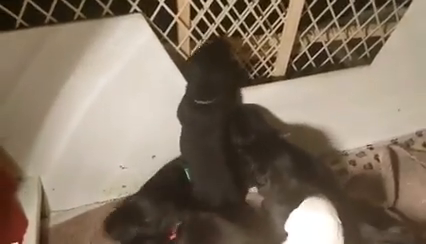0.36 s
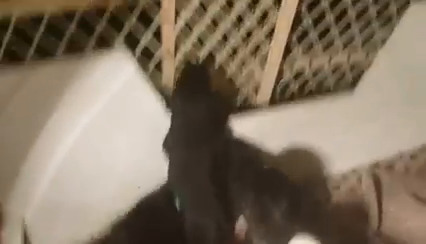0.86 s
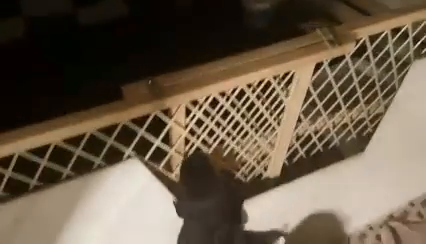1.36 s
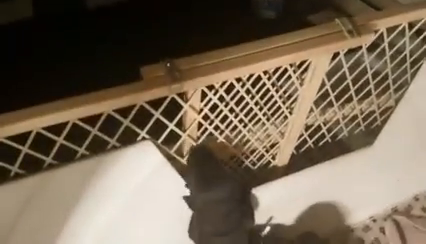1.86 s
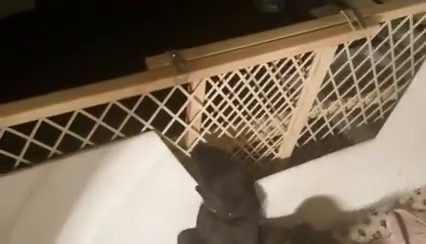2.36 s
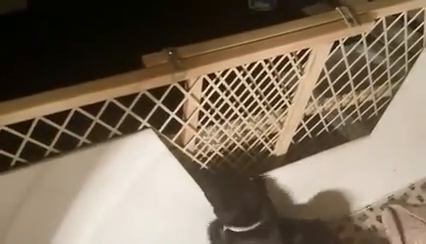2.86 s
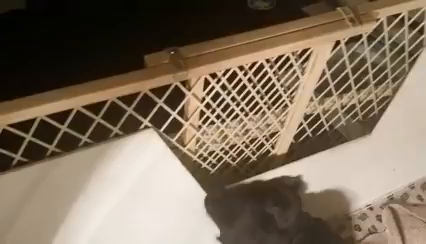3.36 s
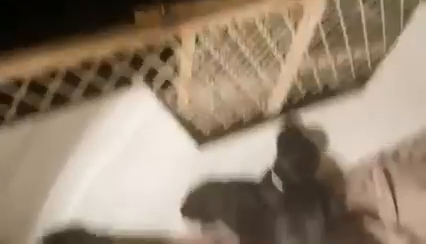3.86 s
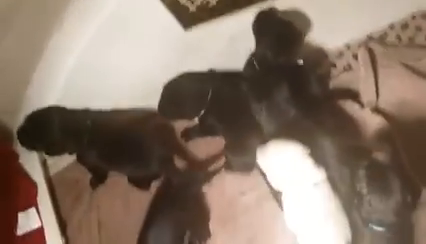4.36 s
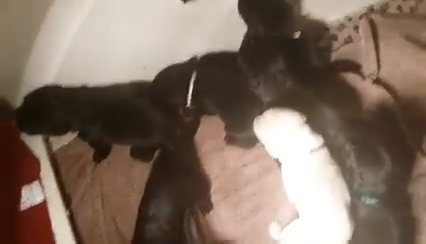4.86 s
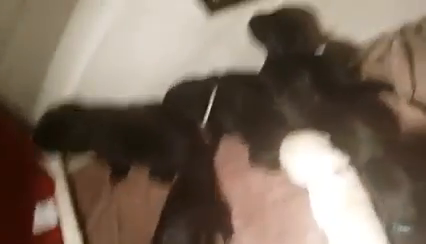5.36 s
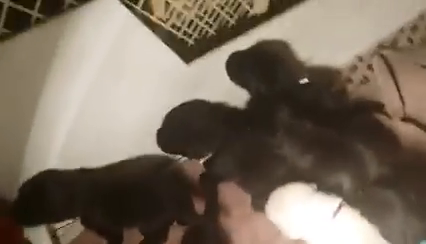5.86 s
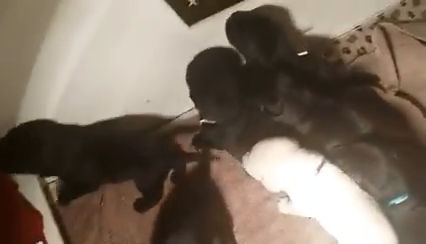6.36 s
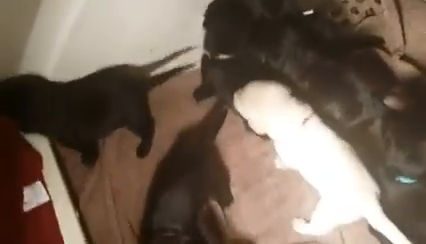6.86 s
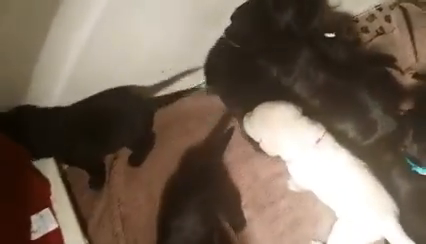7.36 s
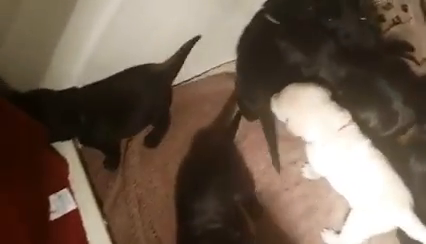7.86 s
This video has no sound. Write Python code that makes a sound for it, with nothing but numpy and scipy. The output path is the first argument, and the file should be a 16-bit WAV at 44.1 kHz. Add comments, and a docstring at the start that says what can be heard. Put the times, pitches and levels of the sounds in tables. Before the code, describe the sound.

A puppy litter in a small, hard-walled indoor pen, heard closely over faint steady hiss with a short, dull echo. From 0 to 1.5 seconds there are only weak whimpers, sniffs and slight rustle, with handling bumps around 0.7-0.85 and a very sharp click at 0.96, mostly right. At 1.7-2.1 a thin whine rises, then falls, followed by softer whines, yips and breathy puffs to 3. Around 3.3-3.6 low whines and yips mix with blanket rustle and a cluster of knocks. Short whimpers and yips follow near 4.1, with a click at 4.4. It quiets around 5, then whines and rustling return at 5.4-5.8. A hard click marks 6.2 as high whining swells, sliding down into a low moan by 6.9. A bright yip comes at 7.17, then small whimpers, sniffs and brief yips until a final whine around 8.2.

```python
"""A small hard-walled pen closed by a wooden gate, where a litter of puppies whines and whimpers.
Voices are harmonic sums on gliding pitches, some with half-pitch lines, answered by the near walls.
Shaped noise makes the puffs and sniffs, the blankets, the shuffling bodies and the room tone.
The hand on the recorder makes its case click (decaying modes) and bump (filtered pressure steps),
mostly at the right microphone port."""
import sys
import numpy as np
from scipy import signal
from scipy.fft import rfft, irfft, next_fast_len
from scipy.io import wavfile

SR = 44100
rng = np.random.default_rng(int(sys.argv[2]) if len(sys.argv) > 2 else 0)


def output_pcm(signal):
    """Save a mono or channel-first signal as 16-bit PCM at the path in sys.argv[1].

    Samples are clipped to [-1, 1] before scaling.
    """
    pcm = np.clip(np.atleast_2d(signal).T, -1, 1) * 32767
    wavfile.write(sys.argv[1], SR, np.round(pcm).astype(np.int16))


def elevation(decibels):
    """Turn decibel levels (scalar or array-like) into linear amplitude ratios."""
    levels = np.asarray(decibels, float)
    return 10 ** (levels / 20)


N = 362943


def rms_one(x):
    """Normalisation: scales a signal to unit root-mean-square."""
    return x / np.sqrt(np.mean(x ** 2) + 1e-20)


def in_time(rows, t):
    """Linear interpolation: reads each column of a breakpoint table at the times t."""
    s, *columns = np.transpose(rows)
    return [np.interp(t, s, c) for c in columns]


def drift(rate_hz, size):
    """Low-passed chance: white noise through two equal real poles wanders slowly; rms 1."""
    r = np.exp(-2 * np.pi * rate_hz / SR)
    settle = 4000
    noise = rng.standard_normal(size + settle)
    return rms_one(signal.lfilter([1], [1, -2 * r, r * r], noise)[settle:])


def coloured(spectrum, alike):
    """Partial coherence: mid and side noises of one spectrum set the left-right likeness; rms 1."""
    hz, db = np.transpose(spectrum)
    size = next_fast_len(N)
    f = np.arange(size // 2 + 1) * SR / size + 1
    gain = elevation(np.interp(np.log(f), np.log(hz), db, left=-90, right=-90))
    mid, side = irfft(rfft(rng.standard_normal((2, size))) * gain, size)[:, :N]
    return rms_one(np.sqrt(1 + alike) * mid + np.sqrt(1 - alike) * side * np.array([[1], [-1]]))


def swells(rows, fall_db_per_s):
    """Energy addition: each row rises 20 dB per swell time, holds, then fades; powers add."""
    t = np.arange(0, N + 64, 64) / SR
    s, swell, hold, *levels = np.transpose(rows)[:, :, None]
    rise_db = -20 * np.maximum(s - t, 0) / np.maximum(swell, .005)
    fall_db = -fall_db_per_s * np.maximum(t - s - hold, 0)
    envelopes = []
    for db in levels:
        power = np.sum(elevation(2 * (db + rise_db + fall_db)), axis=0)
        envelopes.append(np.interp(np.arange(N) / SR, t, np.sqrt(power)))
    return envelopes


# spectrum of the room tone: (f/Hz, relative level/dB)
ROOM_SPECTRUM = [(18, -63), (30, -41), (43, 5), (566, 3), (816, -3), (3190, -10), (6310, -13),
                 (10900, -16.5), (14200, -11.5), (15800, -31)]


def room_tone():
    """Stationary noise: a steady, partly coherent background of fixed spectrum."""
    return elevation(-68.5) * coloured(ROOM_SPECTRUM, alike=0.47)


# hoarseness of the litter: (t/s, full rasp against the tone: level/dB)
RASP = [(.3, -10), (1.3, -13), (1.5, -6), (1.7, -22), (2.0, -22), (2.06, -7), (3.1, -9), (5.9, -10),
        (6.1, -17), (6.35, -16), (6.4, -14), (6.5, -16), (6.9, -15), (7.5, -6), (8.1, -6), (8.15, -10)]


def fold_chance():
    """Aperiodicity of the folds: one tremble, waver and rasp, read at the time of each call."""
    rasp_db, = in_time(RASP, np.arange(N) / SR)
    return drift(34.2, N), drift(51, N), elevation(rasp_db) * drift(155, N)


# mouth resonance on the two lowest partials: (f/Hz, level/dB)
MOUTH_RESONANCE = [(300, -0.5), (420, -10.5), (600, -3.5), (800, 1.5), (1100, 0.5), (1600, -9.5),
                   (2300, -3), (3200, -12)]
# throat colour of the partials above the octave, against the two lowest: (f/Hz, level/dB)
THROAT_COLOUR = [(900, -2.5), (1500, -7), (2400, -16), (3700, -18.5), (4800, -14), (6200, 5.5), (7600, -10),
                 (8800, 2.5), (11000, -28)]


def voice(rows, chance, high_db):
    """Source and filter: near-sine folds on a trembling pitch, shaped by mouth and throat."""
    jitter, shimmer_db = .011, 1.8     # rms pitch share; rms level swing
    rasp_growth_s = .04                # a call starts clear and roughens
    a, b = int(rows[0][0] * SR), min(int(rows[-1][0] * SR), N)
    n = np.arange(b - a)
    tremble, waver, rasp = [c[a:b] for c in chance]
    hz, effort_db, open_db, *half_db = in_time(rows, np.arange(a, b) / SR)
    rasp = rasp * np.clip(n / (rasp_growth_s * SR), .2, 1)

    mouth_hz, mouth_db = np.transpose(MOUTH_RESONANCE)
    first_db = effort_db + np.interp(np.log(hz), np.log(mouth_hz), mouth_db)
    octave_db = open_db + effort_db + np.interp(np.log(2 * hz), np.log(mouth_hz), mouth_db)
    phase = 2 * np.pi * np.cumsum(hz * (1 + jitter * tremble)) / SR
    tone = elevation(first_db) * np.sin(phase) + elevation(octave_db) * np.sin(2 * phase)
    for db in half_db:     # the half-pitch line and its third harmonic
        tone += elevation(db) * (np.sin(phase / 2) + elevation(-3.5) * np.sin(3 * phase / 2))

    throat_hz, throat_db = np.transpose(THROAT_COLOUR)
    drive = elevation(first_db - 4.0) + elevation(octave_db)
    for k in range(3, 16):
        shape_db = np.interp(np.log(k * hz), np.log(throat_hz), throat_db, right=-90)
        shape_db += high_db - 13.97 * np.log2(k / 2)     # the pulse of the folds weakens with order
        blurred = k * (phase + .6 * rasp) + k * k        # rasp blurs high orders most
        tone += drive * elevation(shape_db) * np.sin(blurred)

    edge = np.minimum(1, np.minimum(n / (0.0009 * SR), n[::-1] / (0.0025 * SR)))
    out = np.zeros(N)
    out[a:b] = np.sqrt(2) * tone * edge * elevation(shimmer_db * waver) * (1 + rasp)
    return out


ATTACK_S, RELEASE_S = .012, 0.02
QUIET_DB = -30     # short calls start from and die to this level against their effort


def short_call(s, length, first_hz, last_hz, db, octave_db):
    """Envelope and glide: attack, a held glide, release; the mouth opens with effort in the attack."""
    opening_db_per_db = 4.5
    end = s + max(length, ATTACK_S + .002)
    shut_db = octave_db + opening_db_per_db * QUIET_DB
    return [(s, first_hz, db + QUIET_DB, shut_db), (s + ATTACK_S, first_hz, db, octave_db),
            (end, last_hz, db, octave_db), (end + RELEASE_S, last_hz, db + QUIET_DB, octave_db)]


# whimpers whose every second cycle weakens:
# (t/s, length t/s, pitch f/Hz, effort level/dB, half-pitch line level/dB)
WHIMPER_CALLS = [(0.0, 0.051, 795, -49.5, -61), (0.209, 0.017, 725, -44, -51),
                 (3.158, .04, 793, -42, -54.5), (3.818, 0.034, 763, -40, -42),
                 (4.035, .04, 819, -33.5, -48), (4.072, .035, 905, -45, -43), (4.562, .03, 857, -49, -55.5),
                 (4.97, 0.037, 717, -43, -46.5), (7.477, 0.0714, 875, -39, -47),
                 (7.731, 0.048, 791, -36, -52), (8.0, .06, 809, -37, -44)]


def whimper(s, length, hz, db, half_db):
    """Period doubling: a sagging call whose half-pitch line grows in and outlasts the tone."""
    pitch_sag, break_s = 0.064, 0.032     # share of pitch lost; time until the line is full
    length = max(length, ATTACK_S + break_s + 0.0014)
    start, full, end, gone = short_call(s, length, hz, hz * (1 - pitch_sag), db, octave_db=-7.0)
    return [(*start, half_db + 2 * QUIET_DB), (*full, half_db + QUIET_DB),
            (full[0] + break_s, *full[1:], half_db),
            (*end, half_db), (*gone, half_db + QUIET_DB / 2)]


def whimpers(chance):
    """Superposition: the sum of all period-doubled whimpers."""
    return sum(voice(whimper(*row), chance, high_db=-1.5) for row in WHIMPER_CALLS)


def pen(x):
    """Reverberation: dense dull reflections of the near walls, drawn for each side, dying fast."""
    t60_s, cut_hz, level_db = 0.22, 4600, -11.5
    t = np.arange(int(.4 * SR)) / SR
    tail = rng.standard_normal((2, len(t))) * elevation(-60 * t / t60_s) * (t > .004)
    tail = signal.sosfilt(signal.butter(1, cut_hz, fs=SR, output="sos"), tail)
    tail = tail / np.sqrt(np.sum(tail ** 2, axis=1, keepdims=True))
    return elevation(level_db) * signal.fftconvolve(x, tail, axes=1)[:, :N]


# colour of the two ports: (f/Hz, left minus right level/dB)
PORT_COLOUR = [(60, -3.0), (150, -1), (380, -5.5), (950, -5.0), (2380, -6), (5980, 4.5), (15000, -7.5)]


def placed(x):
    """Interaural-style cues: the two ports differ in colour and in time of arrival."""
    left_lag_s = 0.00013
    hz, db = np.transpose(PORT_COLOUR)
    size = next_fast_len(N)
    f = np.arange(size // 2 + 1) * SR / size + 1
    sides = elevation(np.interp(np.log(f), np.log(hz), db) / [[2], [-2]])
    late = np.exp(-2j * np.pi * f * left_lag_s * np.array([[1], [0]]))
    return irfft(rfft(x, size) * sides / sides.mean(axis=0) * late, size)[:, :N]


# puffs, sniffs and the air of the calls: (full strength at t/s, swell t/s, hold t/s, level/dB)
PUFF_SWELLS = [(.02, 0.06, 0.12, -68.5), (.254, 0.13, 0.018, -64), (.464, 0.039, 0, -63.5),
               (.683, 0.023, 0.065, -67.5), (.838, 0.033, 0.065, -58), (.963, 0.0097, .0, -42),
               (1.0, .03, 0.049, -57), (1.19, 0.054, 0.17, -66), (1.49, 0.12, 0.078, -59.5),
               (1.8, 0.32, 0.049, -55.5), (2.04, 0.32, 0.027, -47.5), (2.335, 0.024, 0.095, -50.5),
               (2.56, 0.15, 0.044, -47.5), (2.9, 0.25, 0.057, -50.5), (3.34, 0.27, 0.047, -48),
               (3.627, 0.13, 0.0099, -44.5), (3.756, .04, 0.079, -53.5), (4.0, 0.14, 0.0032, -40),
               (4.2, 0.19, 0, -57), (4.42, 0.35, 0.023, -58), (4.59, 0.027, 0, -65),
               (4.764, .015, 0.27, -69), (5.093, 0.15, .0, -63.5), (5.265, .03, 0.066, -46),
               (5.572, 0.13, .0, -44.5), (5.747, 0.1, .0, -43.5), (6.056, 0.63, 0.083, -54),
               (6.321, 0.15, 0.15, -56), (6.6, 0.17, 0.2, -54), (6.834, 0.14, 0.0086, -49.5),
               (6.964, .02, 0.014, -41.5), (7.109, 0.052, 0.045, -52), (7.323, 0.34, 0.019, -48.5),
               (7.523, 0.11, 0.075, -56), (7.643, 0.019, .0, -44.5), (7.78, 0.19, 0.011, -58.5),
               (8.0, 0.37, 0.041, -50.5), (8.132, 0.018, 0.025, -44.5)]
# spectrum of the breath: (f/Hz, relative level per Hz/dB)
BREATH_SPECTRUM = [(1180, -13.5), (2000, 1.5), (2680, -8.5), (2930, -6.5), (4830, -5), (6370, -0.5),
                   (7580, -10), (8400, -4.5), (11800, -17), (15000, -14), (15800, -45)]


def breath():
    """Turbulence: smooth hiss of fixed spectrum under the swell of each puff, lightly fluttering."""
    puffing, = swells(PUFF_SWELLS, fall_db_per_s=212)
    return coloured(BREATH_SPECTRUM, alike=.15) * puffing * elevation(1.8 * drift(15, N))


# the litter moves: (full strength at t/s, swell t/s, hold t/s,
# blanket rustle level/dB, shuffling of bodies level/dB)
MOVE_SWELLS = [(.02, 0.056, 0.16, -63, -68), (.7, 0.45, 0.089, -74.5, -62.5),
               (.863, 0.064, 0.16, -53.5, -65), (1.2, 0.055, 0.17, -60.5, -72),
               (1.49, 0.1, 0.063, -52, -71), (1.8, 0.6, 0.097, -55, -63), (2.33, 0.046, 0.36, -54.5, -63.5),
               (2.72, 0.51, 0.23, -67, -53.5), (3.317, 0.068, .0, -45.5, -55),
               (3.527, 0.13, 0.33, -55, -58.5), (4.0, 0.17, 0.056, -49, -56),
               (4.874, 0.21, 0.071, -57.5, -69), (5.288, 0.13, 0.054, -51.5, -58.5),
               (5.582, 0.1, .0, -38, -47.5), (5.8, 0.45, 0.92, -54, -62), (6.3, 0.22, 0, -47, -64),
               (6.834, 0.14, 0.15, -65, -57.5), (7.254, 1, 0.025, -49.5, -57.5),
               (7.46, 0.3, 0.31, -64.5, -63.5), (8.1, 0.22, 0.21, -68, -68.5)]
# spectrum of the blankets: (f/Hz, relative level per Hz/dB)
RUSTLE_SPECTRUM = [(150, -89), (250, -17), (342, 0), (496, -2), (718, -2), (1440, -4.5), (4000, -13.5),
                   (5200, -31.5), (8800, -120)]


def movement():
    """Friction noise: blankets rustle in fast grains, bodies shuffle in slower, low lumps."""
    rustling, shuffling = swells(MOVE_SWELLS, fall_db_per_s=118)
    rustle = coloured(RUSTLE_SPECTRUM, alike=0.091) * rustling * elevation(3.2 * drift(68, N))
    low_noise = coloured([(40, -24), (80, 2), (160, -2.5), (300, -7)], alike=0.86)
    shuffle = low_noise * shuffling * elevation(4.3 * drift(26, N))
    return rustle + shuffle


# bumps of the case, before the bass cut:
# (t/s, peak level/dB at the right port, low-cut corner f/Hz, sharpness as high-cut corner f/Hz)
CASE_BUMPS = [(.675, -15, 90, 4500), (0.736, -36.5, 127, 500), (0.834, -26, 260, 660),
              (0.8433, -17.5, 300, 2170), (.886, -36.5, 259, 600), (0.995, -32.5, 198, 700),
              (1.276, -31, 356, 1500), (1.651, -26.5, 217, 432), (3.295, -16.5, 91, 2390),
              (3.33, -17, 86, 2500), (3.4835, -17, 86.5, 2970), (3.4989, -12, 87, 3560),
              (3.565, -17.5, 90, 2020), (5.51, -43.5, 136, 600), (5.57, -32.5, 172, 600),
              (5.806, -31.5, 162, 600)]


def thumps():
    """Step response: a sudden step of pressure leaks away through a steep low cut and swings."""
    out = np.zeros(N)
    for s, db, ring_hz, sharp_hz in CASE_BUMPS:
        step = signal.sosfilt(signal.butter(2, sharp_hz, fs=SR, output="sos"), np.ones(3000))
        push = signal.sosfilt(signal.butter(4, ring_hz, "high", fs=SR, output="sos"), step)
        at = int(s * SR)
        out[at:at + len(push)] += elevation(db) * push / np.abs(push).max()
    return out * elevation([[-20.0], [0]])     # the left port gets 20 dB less


# clicks of the case, before the bass cut:
# (t/s, peak level/dB at the right port, left minus right level/dB)
CASE_CLICKS = [(0.9592, -5, -36), (0.9707, -26, -17), (1.074, -24.5, -39), (1.2326, -20.5, -26),
               (1.312, -40, -22), (4.1396, -21, -10), (4.4177, -11.5, -17), (5.108, -41.5, -12),
               (5.371, -43.5, 14.5), (5.463, -37, -17), (5.841, -53, -10), (6.2053, -5.5, -21),
               (6.209, -19, -17), (6.597, -32, 2), (6.767, -37.5, 8), (6.827, -31, -12)]
# modes of the case: (f/Hz, relative level/dB, t60 t/s)
CASE_MODES = [(850, 0.5, 0.018), (3030, 4, 0.0053), (3630, 25, 0.0017), (4820, 11.5, 0.0033),
              (9000, -2, 0.016), (13000, -46, 0.0024)]


def ticks():
    """Modal decay: each click strikes the short modes of the case with strengths of its own."""
    strike_spread_db, onset_s = 0.48, .00006
    out = np.zeros((2, N))
    t = np.arange(int(.03 * SR)) / SR
    for s, db, pan_db in CASE_CLICKS:
        ring = np.zeros(len(t))
        for hz, mode_db, t60 in CASE_MODES:
            strike_db = mode_db + rng.normal(0, strike_spread_db)
            ring += elevation(strike_db - 60 * t / t60) * np.sin(2 * np.pi * hz * t)
        ring = -ring * (1 - np.exp(-t / onset_s))
        at = int(s * SR)
        out[:, at:at + len(t)] += ring / np.abs(ring).max() * elevation([[db + pan_db], [db]])
    return out


# short yips: (t/s, length t/s, first pitch f/Hz, last pitch f/Hz, effort level/dB)
YIP_CALLS = [(1.152, 0.058, 845, 813, -43.5), (1.429, 0.097, 1057, 974, -43),
             (2.543, 0.028, 814, 770, -32.5), (2.8, 0.05, 1020, 983, -34.5), (3.349, 0.023, 917, 810, -37),
             (3.467, 0.038, 882, 818, -36), (3.563, 0.064, 806, 807, -33.5), (3.801, 0.073, 1092, 963, -44),
             (4.145, 0.023, 902, 795, -31.5), (4.169, 0.0307, 640, 587, -37.5),
             (5.173, 0.0558, 937, 684, -44.5), (6.098, .04, 1726, 1763, -41), (7.02, 0.019, 731, 753, -37),
             (7.167, 0.0073, 835, 830, -23.5), (7.207, 0.042, 990, 1070, -37),
             (7.406, 0.029, 321, 306, -49.5), (7.916, 0.031, 737, 754, -27.5),
             (7.971, 0.021, 657, 615, -42), (7.617, 0.024, 341, 306, -41)]


def yips(chance):
    """Frequency glide: each yip holds one straight glide between attack and release."""
    return sum(voice(short_call(*row, octave_db=-6.5), chance, high_db=-1.0) for row in YIP_CALLS)


# long whines: (level/dB of the high partials, [(t/s, pitch f/Hz, effort level/dB,
# mouth opening as octave gain level/dB, and where it breaks the half-pitch line level/dB)])
WHINE_CALLS = [ (4, [(1.72, 1010, -45.5, -35), (1.765, 1384, -44.5, 0), (1.80, 1604, -32.5, -17),
               (1.845, 1255, -38.5, -8), (1.88, 1291, -37.5, -3), (1.92, 1227, -40.5, -6),
               (1.955, 1134, -36.5, -6), (1.99, 1174, -34.5, -4), (2.02, 1130, -38, -7),
               (2.04, 1053, -37, 4.5), (2.065, 763, -34, 5), (2.09, 734, -42.5, 2), (2.11, 680, -47, -4)]),
               (1, [(2.31, 976, -50.5, -0.5), (2.35, 1160, -51.5, -13), (2.385, 1107, -50, -2),
               (2.42, 874, -46, 12), (2.46, 900, -45.5, 14.5), (2.485, 1027, -41, 2.5),
               (2.54, 967, -37.5, 8.5), (2.62, 929, -52, 9)]), (3.5, [(2.755, 826, -52, -8),
               (2.78, 818, -39, -2), (2.83, 894, -51, 17.5), (2.865, 801, -34, -1),
               (2.905, 812.5, -32.5, 1), (2.935, 604, -43.5, 6), (2.97, 465.7, -37.5, -4.5),
               (3.01, 505, -45, -12)]), (6, [(3.2, 509, -43, -4), (3.23, 593.5, -45.5, 5),
               (3.285, 487, -38.5, -3), (3.34, 468, -32.5, -5), (3.39, 424, -39, -16)]),
               (-6.5, [(4.287, 842, -49, 0), (4.297, 808, -45.5, -15), (4.32, 609, -40, -9),
               (4.345, 625, -31.5, -18), (4.37, 560, -55.5, -0.5)]), (-5, [(5.41, 990, -46, -20),
               (5.43, 936, -43, -10), (5.455, 936, -41.5, -1), (5.47, 870, -30, -9), (5.5, 870, -74, 0)]),
               (0, [(5.67, 982, -48, -20), (5.69, 747, -39.5, -4), (5.735, 888, -34, -8),
               (5.765, 788, -43, -2), (5.785, 588, -33, -26), (5.8, 500, -41, 0)]),
               (1.5, [(6.015, 784, -47, 5), (6.03, 786, -45, 7), (6.08, 872, -44, 11.5),
               (6.115, 539, -36, -3), (6.14, 353, -31.5, -13.5), (6.17, 294, -44, -8)]),
               (2, [(6.17, 1190, -58, -32), (6.182, 1213, -30.5, -17), (6.2, 1328, -39.5, -5),
               (6.24, 1563, -29, -5), (6.3, 1600, -30, -5.5), (6.325, 978, -29.5, -22),
               (6.36, 1040, -62, 4)]), (9.5, [(6.365, 1012, -43.5, -1), (6.395, 796, -41, 11),
               (6.42, 844, -36.5, 5), (6.45, 813, -52.5, 6), (6.47, 820, -72, -8)]),
               (-1.5, [(6.51, 1110, -41, -15), (6.525, 832, -30.5, -15), (6.55, 1049, -32.5, 3.5),
               (6.59, 1079, -30.5, 4.5), (6.615, 765.5, -29, -4), (6.655, 490.3, -32, 2.5),
               (6.72, 408.8, -35, 12.5), (6.745, 374.2, -31.5, 10), (6.765, 385.5, -27.5, 4),
               (6.785, 322.7, -30.5, 3.5), (6.815, 386.3, -32.5, 10.5), (6.855, 323, -27, -10),
               (6.93, 338, -69, 0)]), (-5.5, [(7.11, 1004, -58, -5), (7.12, 879, -30.5, -15),
               (7.13, 576.5, -38.5, 8.5), (7.16, 652, -36, 1.5), (7.18, 670, -23, -19)]),
               (-5, [(7.23, 780, -48, -8), (7.245, 748, -34, -6), (7.295, 685, -39.5, 7),
               (7.32, 656, -35.5, -9), (7.36, 624, -65, 0)]), (-6, [(7.848, 886, -49, -8),
               (7.86, 967, -33, -9), (7.89, 841, -31, -2)]), (1.5, [(7.885, 495, -42, 2.6667),
               (7.91, 563, -37, 9), (7.93, 654, -42, 8), (7.945, 646, -51, 5)]),
               (-6, [(8.15, 798, -52, -10, -77), (8.165, 832, -33.5, 3, -72), (8.185, 850, -28.5, 3, -55),
               (8.2, 830, -31, -3, -46.5), (8.229, 778, -29.5, -8, -42)]), ]


def whines(chance):
    """Frequency modulation: pitch, effort and mouth opening glide from point to point."""
    return sum(voice(rows, chance, high_db) for high_db, rows in WHINE_CALLS)


def scene():
    """Superposition: airborne sounds reach both ports with their cues; the case adds its own."""
    chance = fold_chance()
    pups = whimpers(chance) + yips(chance) + whines(chance)
    airborne = room_tone() + pups + pen(pups[None]) + breath() + movement()
    return placed(airborne) + thumps() + ticks()


def top_cut(x):
    """Nothing passes above the cut-off."""
    return signal.sosfilt(signal.butter(12, 16490, fs=SR, output="sos"), x)


def record(dry):
    """High-pass response: the microphones cut the deep bass below 30 Hz."""
    mix = signal.sosfilt(signal.butter(2, 30, "high", fs=SR, output="sos"), dry)
    return top_cut(mix)


dry = scene()
out = record(dry)
output_pcm(out)
```